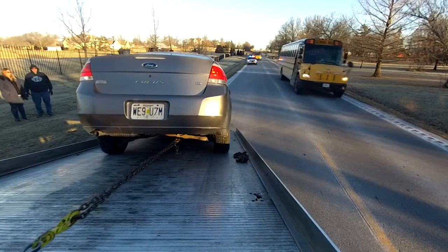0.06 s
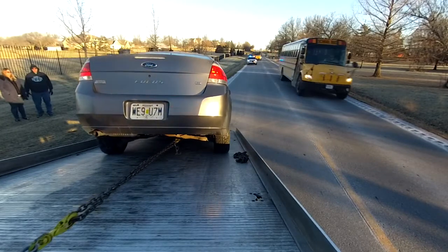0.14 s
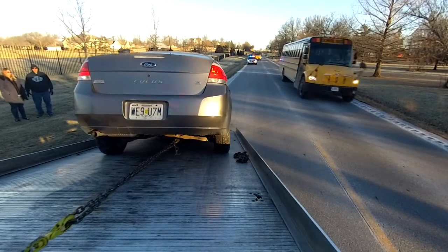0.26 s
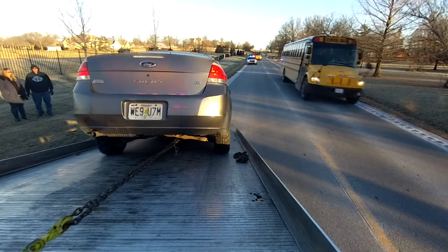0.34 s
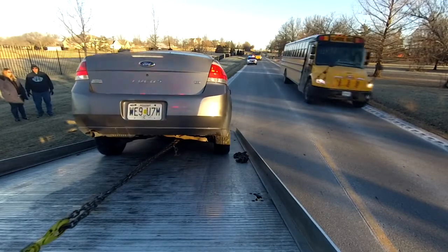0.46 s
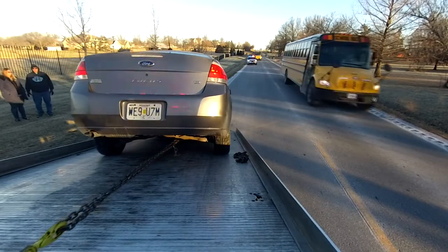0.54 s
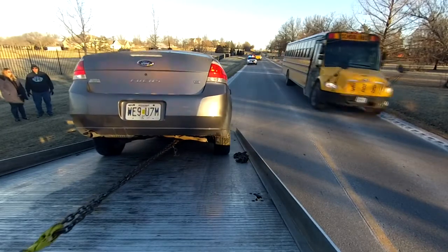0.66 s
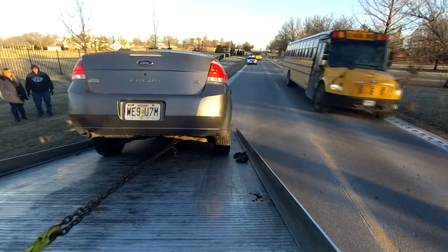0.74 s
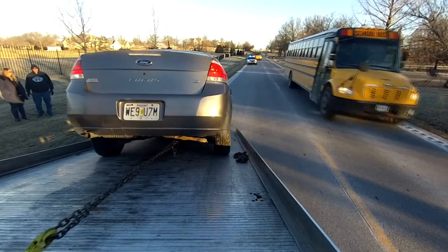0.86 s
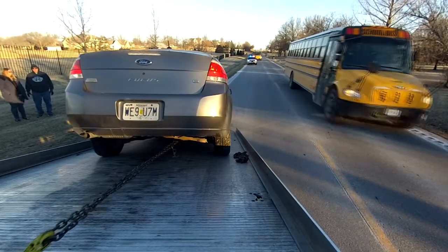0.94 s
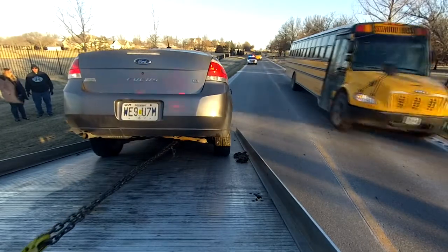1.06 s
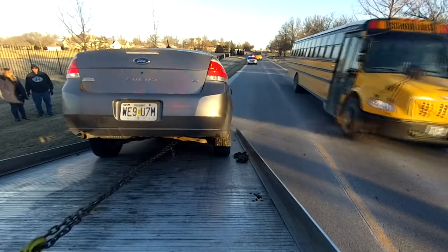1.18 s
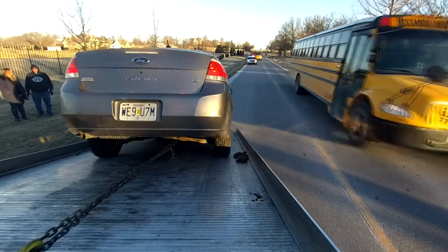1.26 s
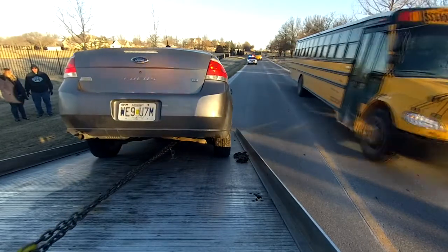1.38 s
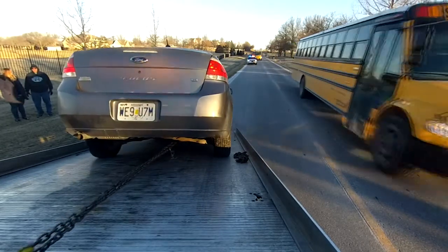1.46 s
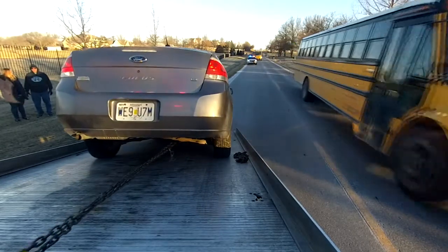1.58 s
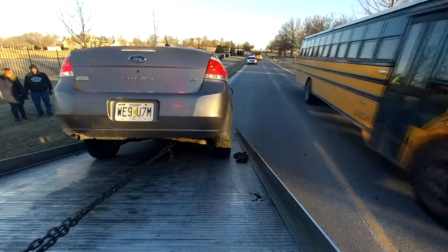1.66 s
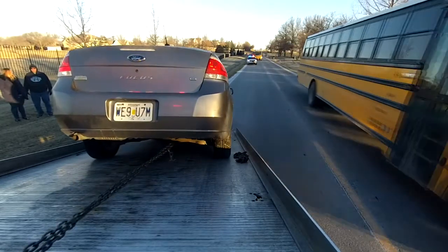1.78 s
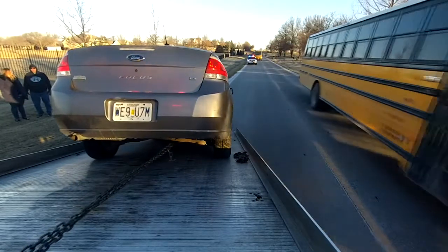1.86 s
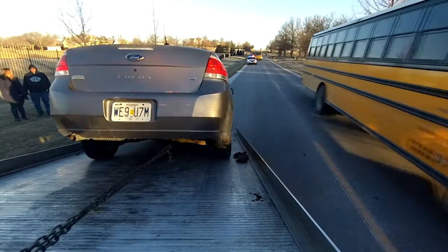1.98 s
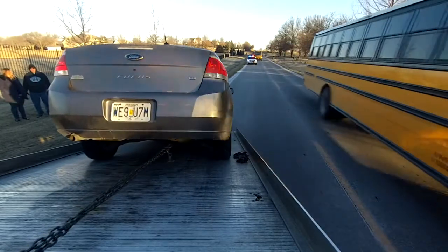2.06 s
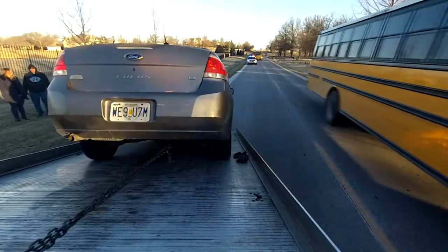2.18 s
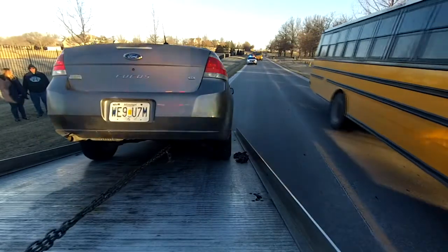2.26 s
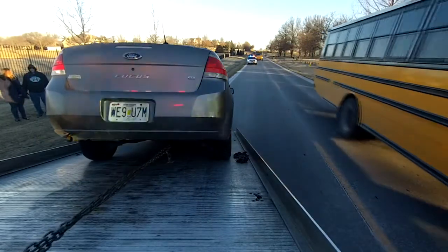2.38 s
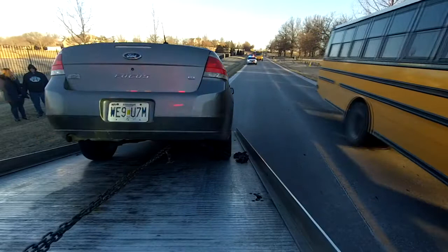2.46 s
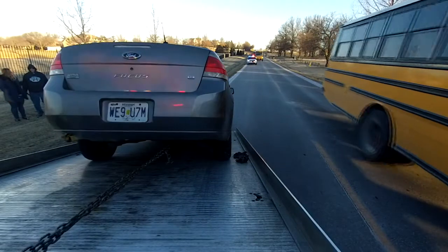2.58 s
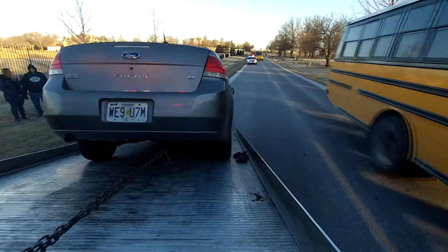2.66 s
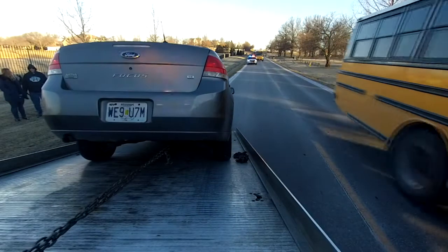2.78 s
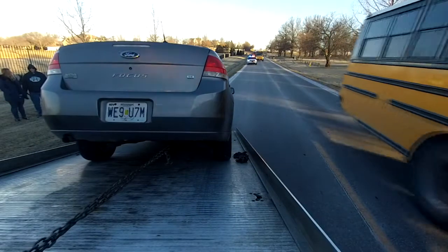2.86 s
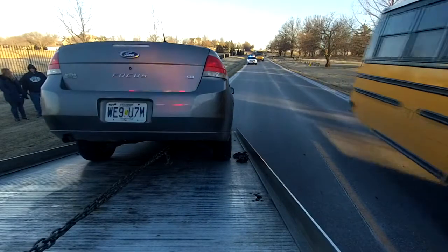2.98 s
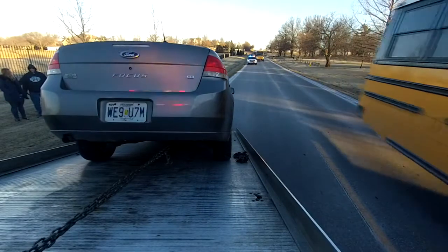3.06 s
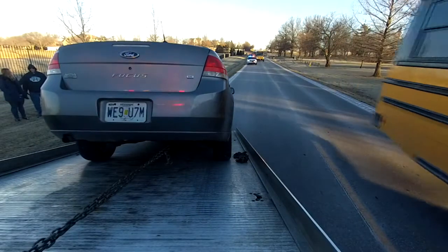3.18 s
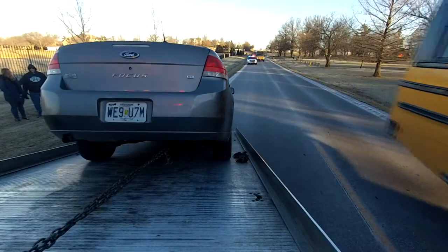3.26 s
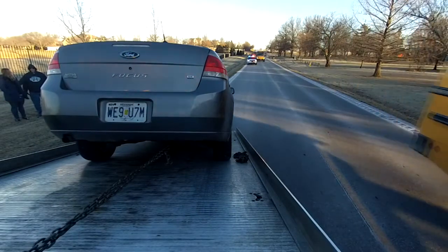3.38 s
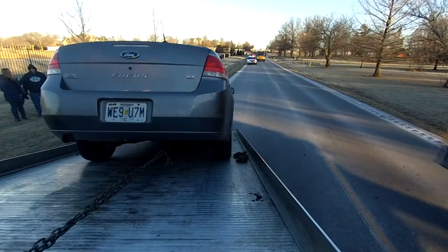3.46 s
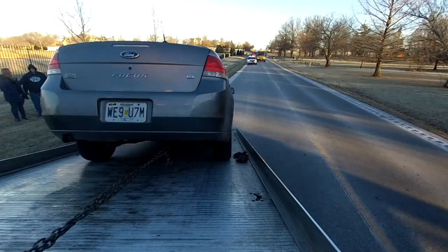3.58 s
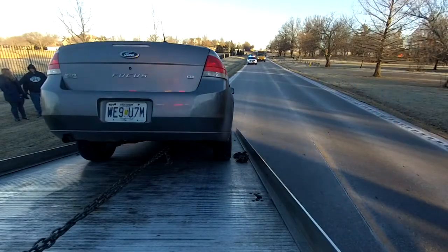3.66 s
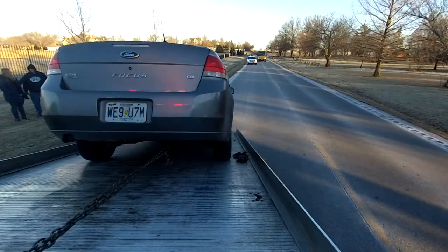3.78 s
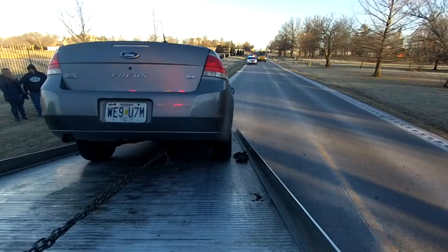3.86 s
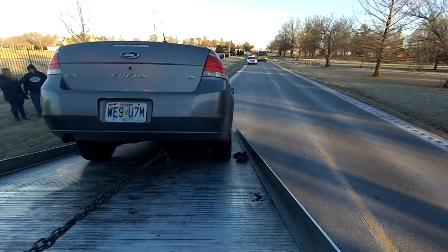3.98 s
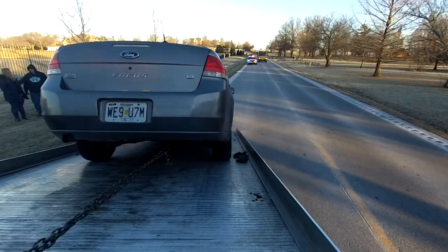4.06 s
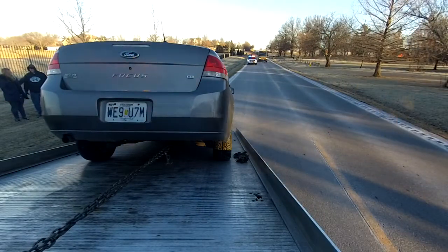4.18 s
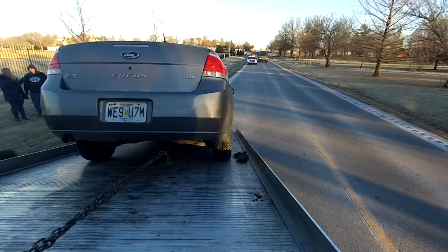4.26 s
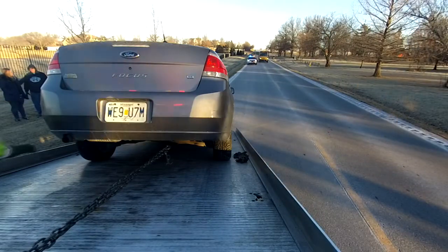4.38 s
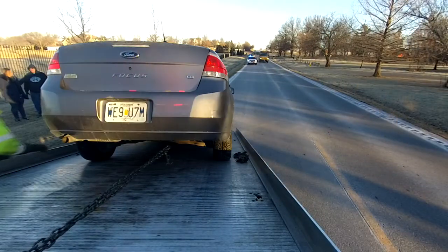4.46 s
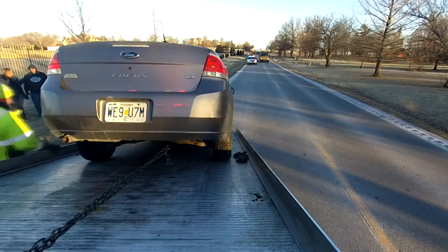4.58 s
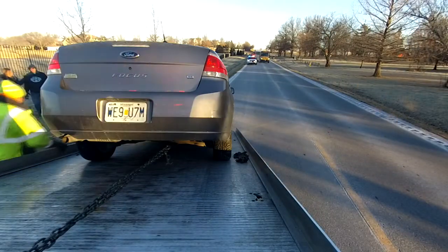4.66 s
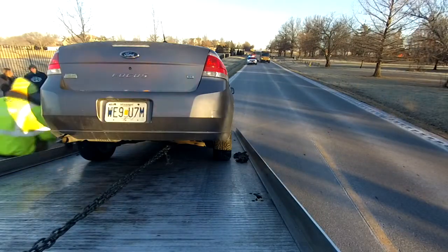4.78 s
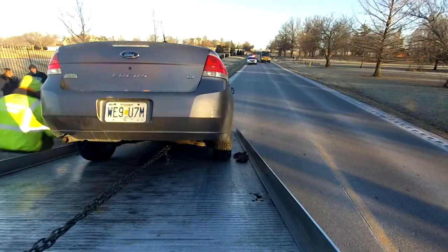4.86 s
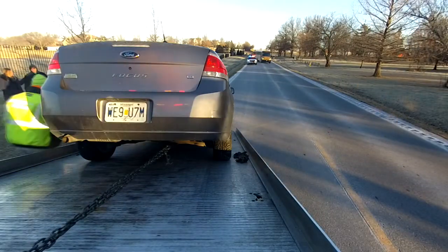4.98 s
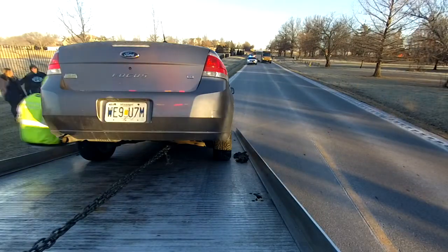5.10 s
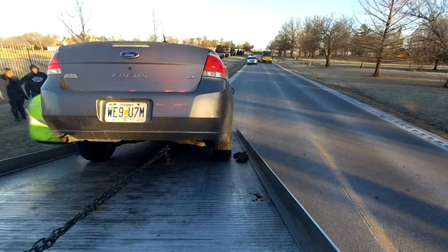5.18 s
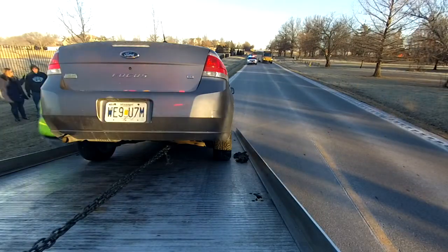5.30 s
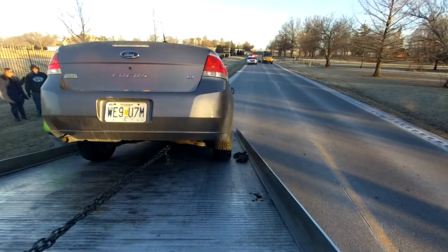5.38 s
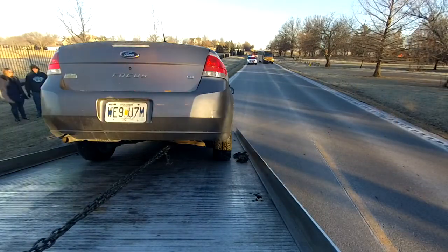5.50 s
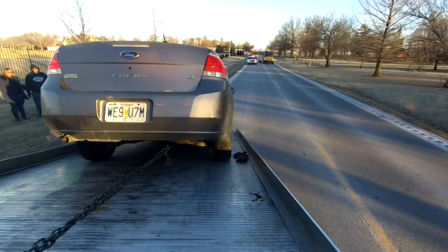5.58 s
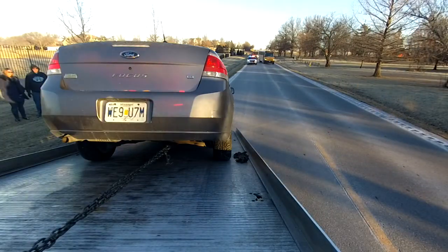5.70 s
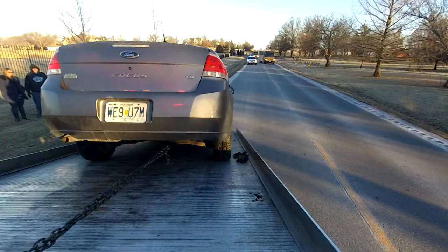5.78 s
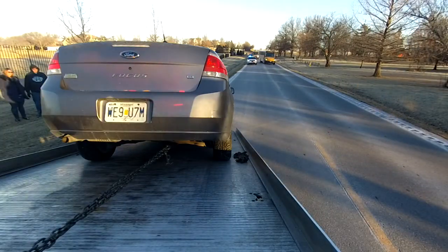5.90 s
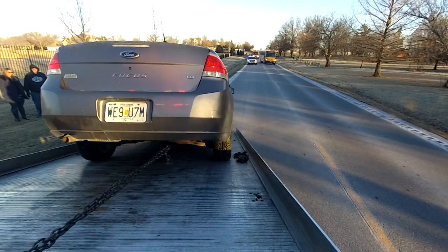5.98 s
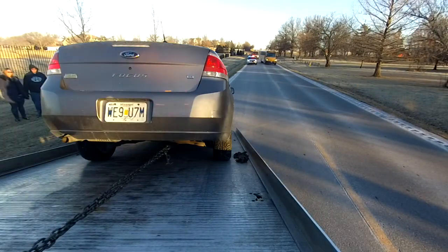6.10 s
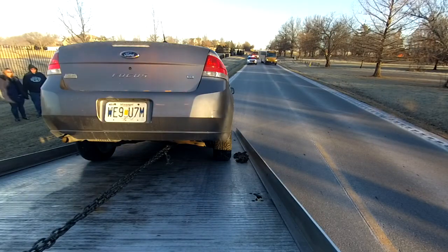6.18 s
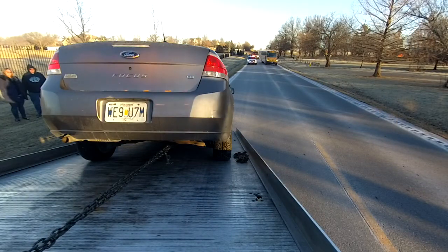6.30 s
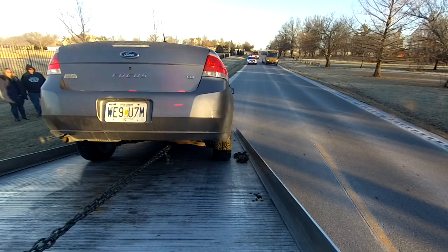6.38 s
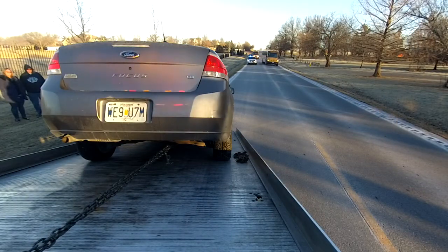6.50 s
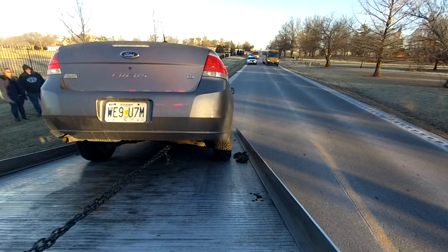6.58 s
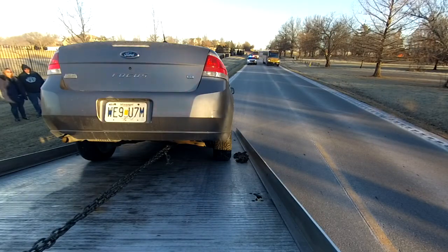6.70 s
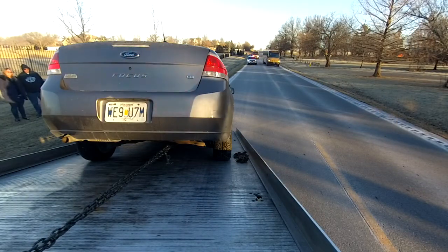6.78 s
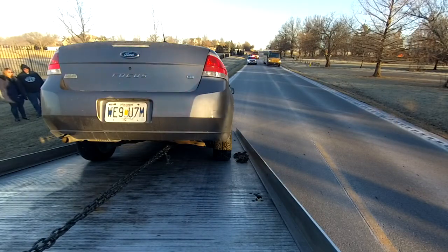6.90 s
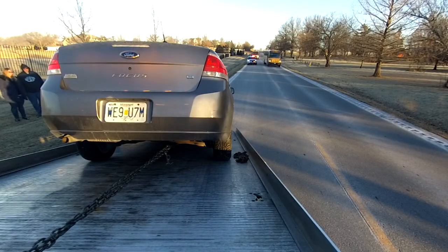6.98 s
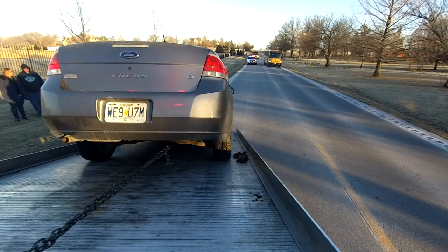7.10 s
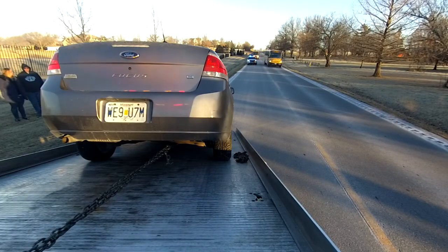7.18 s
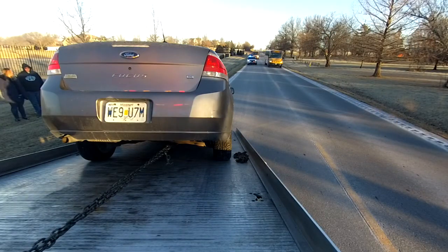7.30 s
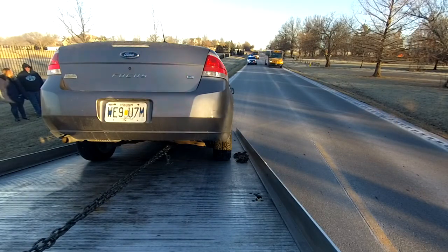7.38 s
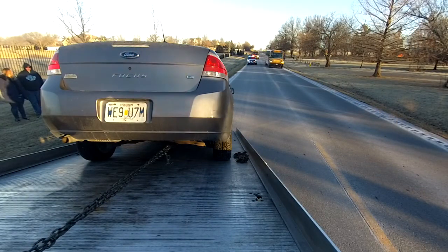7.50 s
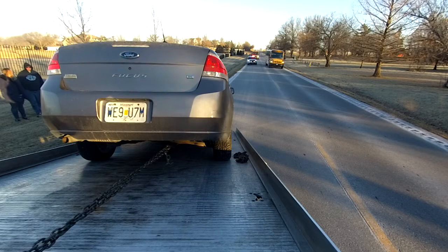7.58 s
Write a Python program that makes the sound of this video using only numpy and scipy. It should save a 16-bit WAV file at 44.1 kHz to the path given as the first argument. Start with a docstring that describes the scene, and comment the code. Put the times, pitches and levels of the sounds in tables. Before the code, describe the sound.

A steady metallic winch whine dominates, ringing through a truck deck beside a road. It drops abruptly in pitch and level with short squeals, rubs and chatters at half speed, then winds down. Afterwards a low-level diesel idle remains: fluttering mechanical whine, fan rush and belt chirp, with fading surges and a faint, falling high whistle. Tyre noise from a bus swells softly and recedes under the winch. Close outdoor microphone, mostly dry.

```python
"""A hydraulic winch whines and hisses as it drags a car up a tow truck's steel bed, slows to half speed, stops.
Its motor repeats one pattern of tones per turn, with grinding noise, through the ring of drum and deck.
Freed of the load, the diesel picks up to idle in fading surges: lines and pulsed noise tied to its firings.
A thin turbo whistle sinks in pitch, and the filtered tyre noise of a bus swells and recedes."""
import sys
import numpy as np
from scipy import signal
from scipy.fft import rfft, irfft, next_fast_len
from scipy.io import wavfile
from scipy.ndimage import uniform_filter1d, map_coordinates

SR = 44100
rng = np.random.default_rng(int(sys.argv[2]) if len(sys.argv) > 2 else 0)


def int16_out(signal):
    """Quantize to a 16-bit WAV file."""
    q = np.round(np.clip(np.atleast_2d(signal).T, -1, 1) * 32767)
    wavfile.write(sys.argv[1], SR, q.astype(np.int16))


N = 336924


def from_db(db):
    """Decibels to gain."""
    return 10 ** (np.asarray(db) / 20)


def rms_one(x):
    """Scale to unit rms."""
    return x / np.sqrt(np.mean(x ** 2) + 1e-20)


def gain_at(points, where):
    """Gain of a dB table, joined by straight lines on a log axis."""
    place, db = np.transpose(points)
    return from_db(np.interp(np.log(where + 1e-9), np.log(place), db))


def colour(x, points):
    """Pass a sound through a frequency response."""
    size = next_fast_len(N + 8192)
    gain = gain_at(points, np.fft.rfftfreq(size, 1 / SR))
    return irfft(rfft(x, size) * gain, size)[:N]


def rush(points):
    """Noise of a given spectrum, rms 1."""
    return rms_one(colour(rng.standard_normal(N), points))


def drift(rate_hz):
    """Slow random wander, rms 1: noise through two equal low-pass poles, drawn every 40 samples."""
    r = np.exp(-80 * np.pi * rate_hz / SR)
    noise = rng.standard_normal(N // 40 + 2002)
    slow = signal.lfilter([1], [1, -2 * r, r * r], noise)[2000:]  # skip the settling
    return np.interp(np.arange(N) / 40, np.arange(len(slow)), rms_one(slow))


def resonate(x, hz, width_hz):
    """One two-pole resonance with unit gain on top."""
    r = np.exp(-np.pi * width_hz / SR)
    feed = np.array([1, 0, -1]) * (1 - r * r) / 2
    return signal.lfilter(feed, [1, -2 * r * np.cos(2 * np.pi * hz / SR), r * r], x)


def throb(cycles, sharpness):
    """One smooth swell per cycle, rms 1."""
    return rms_one(np.exp(sharpness * np.cos(2 * np.pi * cycles)))


def swell(at_s, length_s):
    """A smooth rise and fall of height 1 around a moment."""
    return np.cos(np.pi * np.clip((np.arange(N) / SR - at_s) / length_s, -.5, .5)) ** 2


def above(x, threshold, spread):
    """A soft switch from 0 to 1."""
    return .5 + .5 * np.tanh((x - threshold) / (2 * spread))


def lag(x, seconds):
    """Follow a control with inertia."""
    r = np.exp(-1 / (seconds * SR))
    return x[0] + signal.lfilter([1 - r], [1, -r], x - x[0])


# the bus when nearest, and its loss per tenfold distance
BUS_NEAREST_S, BUS_DB, BUS_M_PER_S, BUS_DISTANCE_M, BUS_LOSS_DB = 2.345, -50.5, 7.45, 5.67, 35
# spectrum of tyres on the road: (frequency [Hz], relative level per Hz [dB])
TYRE_SPECTRUM = [(40, -27), (120, -49), (250, -23), (450, -20), (800, -7), (1250, -5), (1600, -9.5),
                 (2800, -8.5), (3600, -14.5), (6300, -24.5), (15500, -30.5)]


def bus():
    """Tyre noise swells and recedes with the distance of a bus on a straight path."""
    along_m = BUS_M_PER_S * (np.arange(N) / SR - BUS_NEAREST_S)
    distance = np.hypot(1, along_m / BUS_DISTANCE_M)  # 1 when nearest
    return from_db(BUS_DB - BUS_LOSS_DB * np.log10(distance)) * rush(TYRE_SPECTRUM)


# the turbo runs down from its loaded pitch and is half way after TURBO_HALF_S
TURBO_LOADED_HZ, TURBO_IDLE_HZ, TURBO_RELEASE_S, TURBO_HALF_S = 8900, 7330, 2.75, 1.77
TURBO_DB = -94  # the whistle between its flares
# flares added to the turbo whistle: (centre time [s], length [s], peak level [dB])
WHISTLE_FLARES = [(2.8, 1.1, -78), (3.88, .16, -83), (4.28, .14, -80), (5.5, 2.1, -93)]


def turbo(unsteady=0.00077):
    """A thin, slightly unsteady whistle sinks as the turbine runs down."""
    coasting = np.maximum(np.arange(N) / SR - TURBO_RELEASE_S, 0) / TURBO_HALF_S
    hz = TURBO_IDLE_HZ + (TURBO_LOADED_HZ - TURBO_IDLE_HZ) / (1 + coasting ** 2)
    flares = sum(from_db(db) * swell(s, length_s) for s, length_s, db in WHISTLE_FLARES)
    cycles = np.cumsum(hz * (1 + unsteady * drift(60))) / SR
    return (from_db(TURBO_DB) + flares) * np.sqrt(2) * np.sin(2 * np.pi * cycles)


SURGE_SKEW = .6  # under 1, a surge rises faster than it falls
# surges of the freed diesel:
# (start time [s], length [s], extra firing rate [1/s], rise of the gear whine [dB])
ENGINE_SURGES = [(2.878, 0.88, 1.05, 16), (3.679, .78, .95, 12), (4.624, 1.1, .32, 7)]


def surges():
    """Extra firing rate and extra gear whine (dB) while the governor hunts."""
    t = np.arange(N) / SR
    extra_rate, whine_db = 0, 0
    for s, length_s, firings_per_s, db in ENGINE_SURGES:
        hump = np.sin(np.pi * np.clip((t - s) / length_s, 0, 1) ** SURGE_SKEW)
        extra_rate = extra_rate + firings_per_s * hump
        whine_db = whine_db + db * hump
    return extra_rate, whine_db


# the diesel sags under the pump's load and recovers with a lag (firings per s)
IDLE_FIRINGS_HZ, LOADED_FIRINGS_HZ, LOAD_POWER, GOVERNOR_S = 36.97, 30.0, 1.35, .12
# pump ripple: at idle, rise under full load, rise per extra firing per s
RIPPLE_DB, RIPPLE_LOAD_DB, RIPPLE_SURGE_DB = -85, 20.5, 6
# its octave swells where it meets a resonance of the oil pipe
OCTAVE_DB, PIPE_HZ, PIPE_WIDTH_HZ, PIPE_DB = -75.5, 475, 4.4, 9
# gear whine outside the surges, belt chirp, ceiling of the exhaust tone
GEAR_DB, BELT_DB, EXHAUST_DB = -75.5, -72.5, -92.5
# rush of engine and fan: at idle, rise per extra firing per s
FAN_DB, FAN_SURGE_DB = -65, 2
# lines of gears and belt: (frequency at idle [Hz], level [dB])
GEAR_AND_BELT_TONES = [(403.7, -86), (776.4, -77.5), (855.9, -73), (963.6, -83), (1206, -77), (1263, -72),
                       (1448, -91), (1553, -89), (1707, -75.5), (1812, -79.5), (2046, -85), (2342, -93),
                       (3004, -80), (3456, -101)]
# resonances of the engine block, struck by each firing: (frequency [Hz], width [Hz], level [dB])
BLOCK_RESONANCES = [(1220, 180, -76), (2630, 13, -73.5)]
# spectrum of the engine and fan rush: (frequency [Hz], relative level per Hz [dB])
FAN_SPECTRUM = [(30, -18), (100, -19), (200, -14), (300, -15), (520, -2), (800, -1), (1200, 5),
                (1600, -0.5), (2300, -2), (3000, -2.5), (4000, -6), (6300, -11), (10000, -13.5),
                (15500, -14.5)]


def diesel(firings, rate, load, surge, whine_db, waver_db=-0.1, wander=0.12):
    """Tones follow the engine speed; each firing knocks the block and makes the belt chirp; the pump ripples."""
    def tone(multiple, db):
        """A slightly wavering line at a multiple of the firing rate."""
        cycles = multiple * firings + wander * drift(2.85)
        return np.sqrt(2) * from_db(db + waver_db * drift(6.9)) * np.sin(2 * np.pi * cycles)

    ripple_db = RIPPLE_DB + RIPPLE_LOAD_DB * load + RIPPLE_SURGE_DB * surge
    off_pipe = (14 * rate - PIPE_HZ) / PIPE_WIDTH_HZ
    octave_db = OCTAVE_DB + PIPE_DB / (1 + off_pipe ** 2)
    whine = sum(tone(hz / IDLE_FIRINGS_HZ, db) for hz, db in GEAR_AND_BELT_TONES)
    knocks = rng.standard_normal(N) * throb(firings, sharpness=2.6)
    block = sum(from_db(db) * rms_one(resonate(knocks, hz, width_hz))
                for hz, width_hz, db in BLOCK_RESONANCES)
    pump = tone(7, ripple_db) + tone(14, octave_db)
    gear = tone(35, GEAR_DB + whine_db)
    belt = tone(69.3, BELT_DB) * throb(firings, sharpness=1.5)
    exhaust = tone(3, np.minimum(ripple_db - 11, EXHAUST_DB))
    fan_level = from_db(FAN_DB + FAN_SURGE_DB * surge)
    fan = fan_level * rush(FAN_SPECTRUM) * throb(firings, sharpness=0.034)
    return whine + block + pump + gear + belt + exhaust + fan


# the valve is throttled in two moves, to half speed and then shut; the times mark the end of each move
FULL_TURNS_PER_S, SLOW_TURNS_PER_S = 16.36, 8.78
THROTTLE_AT_S, SHUT_AT_S = 2.049, 2.998
# each move starts gently and quickens; the drum follows with its inertia (time constants)
LEVER_S, INERTIA_S = .095, .05


def shaft_speed():
    """Turns per second: each move of the valve takes away part of the flow."""
    t = np.arange(N) / SR
    throttled = np.exp(np.minimum(t - THROTTLE_AT_S, 0) / LEVER_S)
    shut = np.exp(np.minimum(t - SHUT_AT_S, 0) / LEVER_S)
    flow = FULL_TURNS_PER_S - (FULL_TURNS_PER_S - SLOW_TURNS_PER_S) * throttled - SLOW_TURNS_PER_S * shut
    return np.maximum(lag(flow, INERTIA_S), 0)


def steel_ring(x, decay_s=0.0099, direct=1.0):
    """Dense short reflections in the steelwork cut narrow peaks and dips into a noise."""
    t = np.arange(2048) / SR
    echoes = rng.standard_normal(len(t)) * np.exp(-t / decay_s)
    echoes = echoes / np.linalg.norm(echoes)
    return (direct * x + signal.fftconvolve(x, echoes)[:N]) / np.sqrt(1 + direct ** 2)


STEPS = 4096  # points round one turn of the shaft
# weak motor tones and grinding, before the deck: (multiple of the shaft rate [1], relative level [dB])
WEAK_ORDERS = [(6, -43.5), (130, -47.5), (260, -50.5), (440, -53), (570, -57.5), (650, -54.5), (790, -62),
               (870, -70)]


def motor_grind(turns):
    """Friction noise is laid out along the shaft angle, so it dulls as the motor slows."""
    size = next_fast_len(int(turns.max() + 2) * STEPS)
    orders = np.fft.rfftfreq(size, 1 / STEPS)
    spectrum = rfft(rng.standard_normal(size)) * gain_at(WEAK_ORDERS, orders)
    track = irfft(spectrum, size) * np.sqrt(STEPS / 2)
    grind = from_db(9) * map_coordinates(track, [turns * STEPS], order=3)
    lobe_passes = 6 * turns
    return grind * throb(lobe_passes, sharpness=0.083)


# at low pressure, tones above this multiple of the shaft rate lose this much
SOFT_MULTIPLE, SOFT_DB = 340, -7
# strong motor tones, before the deck: (multiple of the shaft rate [1], relative level [dB])
STRONG_ORDERS = [(6, -13.5), (12, -26.5), (36, -32.5), (42, -28.5), (48, -31.5), (55, -41.5), (56, -52),
                 (60, -45), (78, -39), (84, -25.5), (90, -33.5), (98, -48), (105, -42), (107, -43),
                 (112, -40), (114, -38), (120, -52.5), (132, -35), (162, -29.5), (168, -33.5), (174, -43),
                 (176, -36.5), (198, -43), (210, -37), (216, -37.5), (222, -36), (246, -33.5), (252, -31),
                 (258, -32), (294, -33.5), (300, -40.5), (384, -29.5), (420, -33), (462, -35), (498, -33.5)]


def motor_tones(turns, pressure, lobe_db=5.0, roller_db=7.5, loose_db=-4.0, squeal_db=-26.0):
    """A six-lobed rotor orbits in seven rollers: the same pressure pattern returns on every turn."""
    k = np.arange(STEPS // 2 + 1)  # multiples of the shaft rate
    lobes, rollers = k % 6 == 0, k % 7 == 0
    emphasis_db = np.maximum(lobe_db * lobes, roller_db * rollers)
    size = gain_at(WEAK_ORDERS, k) * from_db(loose_db + emphasis_db)
    size[(k < 5) | (k > 950)] = 0
    for order, db in STRONG_ORDERS:
        size[round(order)] = from_db(db)
    pattern = size * np.exp(2j * np.pi * rng.random(len(k))) * STEPS / np.sqrt(2)
    # at low pressure the contacts are softer and the highest tones weaken
    softened = pattern * from_db(SOFT_DB * above(k, SOFT_MULTIPLE, 24))

    def play(spectrum):
        """Read one turn of the pattern round and round at the shaft angle."""
        return map_coordinates(irfft(spectrum), [turns * STEPS], order=3, mode="grid-wrap")

    # one squealing tone swells once a turn as the drum bears on its gear
    squeal = from_db(squeal_db) * np.sqrt(2) * np.sin(2 * np.pi * 126 * turns) * throb(turns, sharpness=.6)
    return squeal + pressure * play(pattern) + (1 - pressure) * play(softened)


# above this speed the oil is at full pressure; the change spreads over a range of speeds (turns per s)
PRESSURE_TURNS_PER_S, PRESSURE_RANGE = 12.74, 0.45
# below these speeds the drum rubs, then the motor chatters
RUB_TURNS_PER_S, CHATTER_TURNS_PER_S = 9.2, 8.1
# levels at full and at low pressure, before the fade with the last turns; level of the rub
MOTOR_FULL_DB, MOTOR_SLOW_DB = -31.5, -38.5
HISS_FULL_DB, HISS_SLOW_DB = -45.5, -60
RUB_DB = -46.5
# gain of the grinding in the motor mix: at full and low pressure, added by braking, added by chatter
ROUGH_FULL_DB, ROUGH_SLOW_DB, ROUGH_BRAKING_DB, ROUGH_CHATTER_DB = -13.5, -8, -9, 1.5
# judder as a share of the speed: always, added by braking, added by chatter
JUDDER, JUDDER_BRAKING, JUDDER_CHATTER = .001, .007, .03
SQUEAL_FLUTTER = .45  # depth of the break-up under braking
# single motor tones swell: brief squeals while the motor slows, then one long tone at half speed:
# (centre time [s], length [s], multiple of the shaft rate [1], level before flutter and fade [dB])
MOTOR_SQUEALS = [(1.885, 0.033, 126, -39), (1.928, 0.069, 52, -41.5), (1.961, 0.1, 126, -34),
                 (2.061, 0.069, 84, -42), (2.147, 0.11, 84, -45.5), (2.515, 0.83, 168, -50.5)]
# response of drum and deck: (frequency [Hz], gain [dB])
DECK_RESPONSE = [(60, -49.5), (200, -37.5), (400, -31), (580, -26), (735, -4), (850, -10.5), (980, -12),
                 (1110, -14.5), (1300, -13.5), (1440, -7), (1650, -6.5), (1900, 2), (2080, -5.5),
                 (2380, -18), (2750, -4), (3700, -14.5), (5200, -17), (13000, -20)]
# spectrum of oil squeezed through the valve: (frequency [Hz], relative level per Hz [dB])
OIL_SPECTRUM = [(2060, -46), (3500, -2), (3840, -27), (4060, 12.5), (4270, -1), (4430, 8.5), (4870, -14),
                (5150, 2), (6400, 6), (8420, 2), (9240, -1.5), (10800, 5), (13200, 0), (13800, -41),
                (15500, -73)]


def winch(speed, firings, sway=0.00056, off_centre=0.00046, fade_power=2.46):
    """Motor tones and grinding ring in the deck; oil hisses with the pump strokes; the slow drum rubs."""
    pressure = above(speed, PRESSURE_TURNS_PER_S, PRESSURE_RANGE)
    turning = np.minimum(speed / SLOW_TURNS_PER_S, 1) ** fade_power
    # share of its speed that the shaft loses per second
    braking = np.clip(-np.gradient(speed) * SR / (speed + 1e-6), 0, 4)
    chatter = 1 - above(speed, CHATTER_TURNS_PER_S, 0.12)
    rubbing = 1 - above(speed, RUB_TURNS_PER_S, 0.12)

    def by_pressure(slow_db, full_db):
        """A gain between its values at low and at full pressure."""
        return from_db(slow_db + (full_db - slow_db) * pressure)

    rough = by_pressure(ROUGH_SLOW_DB, ROUGH_FULL_DB)
    rough = rough + from_db(ROUGH_BRAKING_DB) * np.sqrt(braking) + from_db(ROUGH_CHATTER_DB) * chatter
    # the shaft judders more whenever the valve throttles it
    judder = JUDDER + JUDDER_BRAKING * braking + JUDDER_CHATTER * chatter
    turns = np.cumsum(speed * (1 + judder * drift(42.9) + sway * drift(4.1))) / SR
    # the drum is slightly off centre and swings the speed once a turn
    turns = turns + off_centre * np.sin(2 * np.pi * turns)

    motor = motor_tones(turns, pressure) + rough * steel_ring(motor_grind(turns))
    motor = colour(motor, DECK_RESPONSE)
    # the deck cannot radiate the deepest pulsation
    motor = signal.sosfilt(signal.butter(8, 82, "high", fs=SR, output="sos"), motor)
    # even out the running level, then let the pressure set it
    running_rms = np.sqrt(uniform_filter1d(motor ** 2, size=5400) + 1e-12)
    motor = by_pressure(MOTOR_SLOW_DB, MOTOR_FULL_DB) * motor / running_rms

    squeals = 0
    for s, length_s, multiple, db in MOTOR_SQUEALS:
        level = from_db(db) * swell(s, length_s)
        squeals = squeals + level * np.sqrt(2) * np.sin(2 * np.pi * multiple * turns)
    # hard braking breaks them up
    squeals = squeals * (1 + SQUEAL_FLUTTER * np.sqrt(braking) * drift(77))

    pump_strokes = 0.89 + 0.094 * throb(2 * firings, sharpness=0.78)
    hiss = steel_ring(rush(OIL_SPECTRUM), decay_s=0.0032, direct=0.23)
    oil = by_pressure(HISS_SLOW_DB, HISS_FULL_DB) * hiss * pump_strokes

    # the drum rubs twice a turn
    scrape = resonate(resonate(rng.standard_normal(N), 1844, 220), 1844, 220)
    rub = from_db(RUB_DB) * rubbing * rms_one(scrape) * throb(2 * turns, sharpness=.8)
    return turning * (motor + squeals + oil + rub)


def scene():
    """The engine drives the pump, the pump drives the winch, whose speed loads the engine."""
    speed = shaft_speed()
    load = lag((speed / FULL_TURNS_PER_S) ** LOAD_POWER, GOVERNOR_S)
    surge, whine_db = surges()
    rate = IDLE_FIRINGS_HZ - (IDLE_FIRINGS_HZ - LOADED_FIRINGS_HZ) * load + surge
    firings = np.cumsum(rate) / SR
    background = bus() + turbo() + diesel(firings, rate, load, surge, whine_db)
    return (background + winch(speed, firings))[None]


CUTOFF_HZ = 15700


def record(dry):
    """The microphone sheds the deepest bass; the top is cut steeply."""
    thinned = signal.sosfilt(signal.butter(2, 48, "high", fs=SR, output="sos"), dry)
    return signal.sosfilt(signal.ellip(12, .1, 80, CUTOFF_HZ, fs=SR, output="sos"), thinned)


dry = scene()
out = record(dry)
int16_out(out)
```